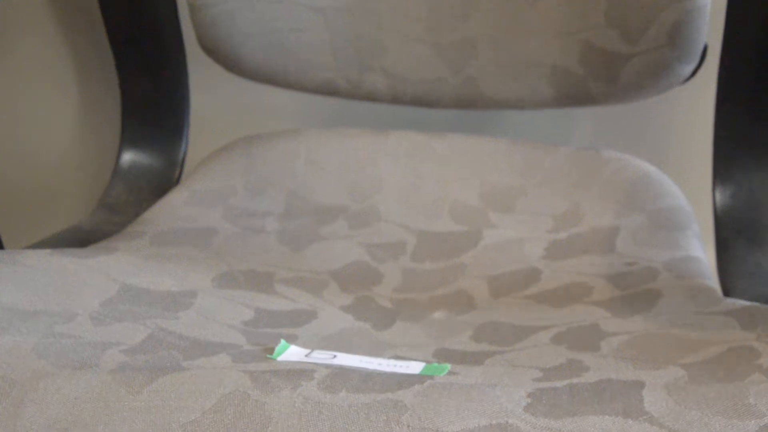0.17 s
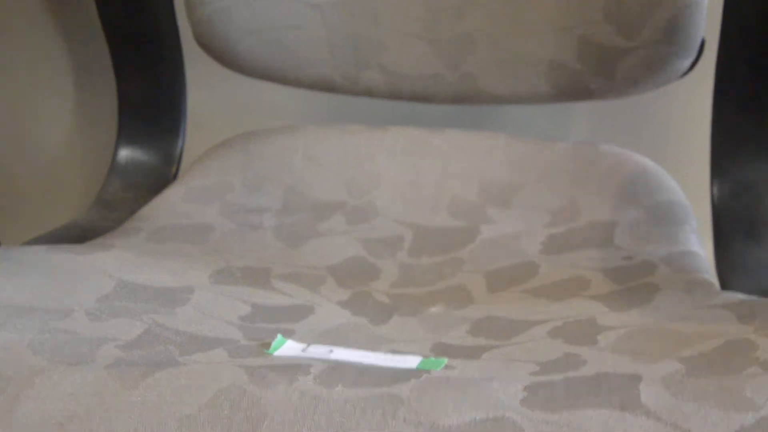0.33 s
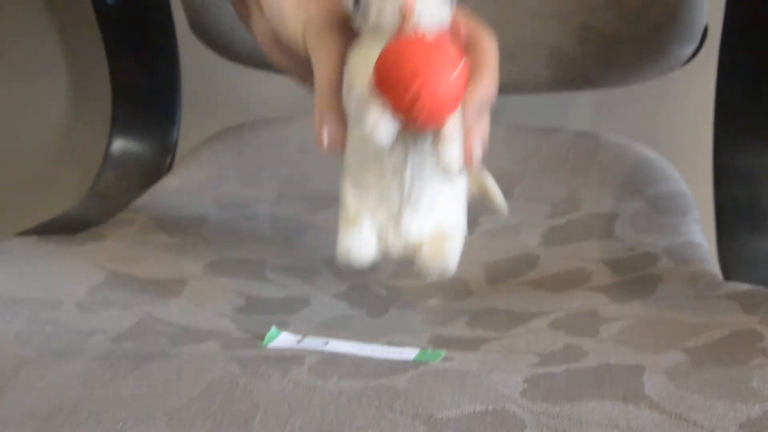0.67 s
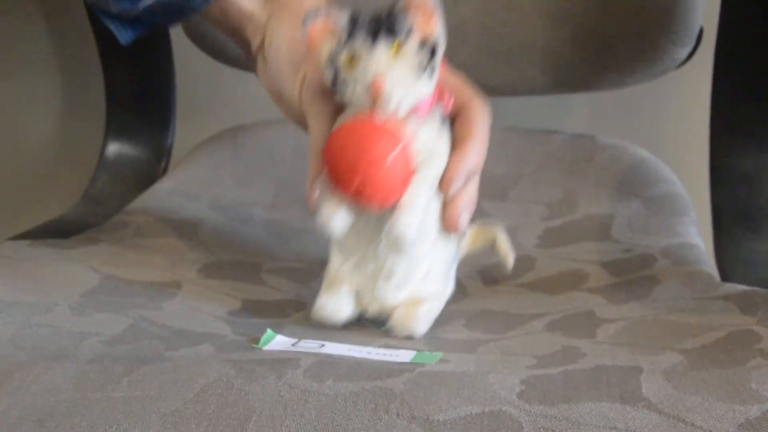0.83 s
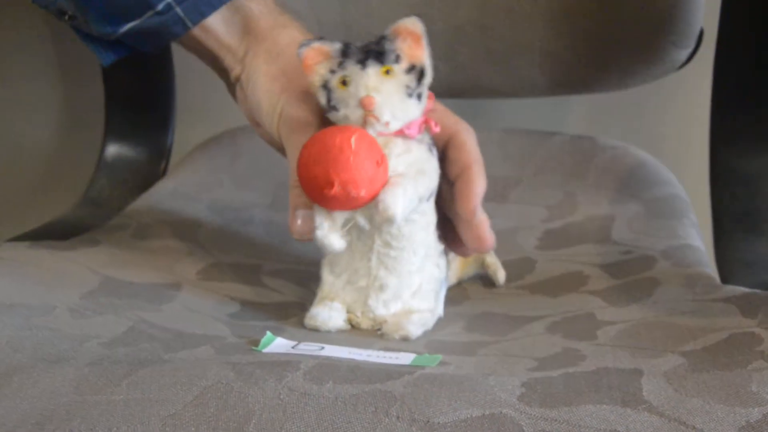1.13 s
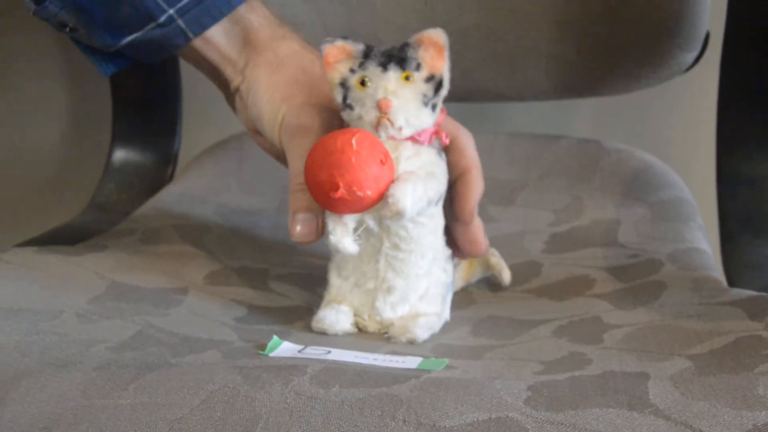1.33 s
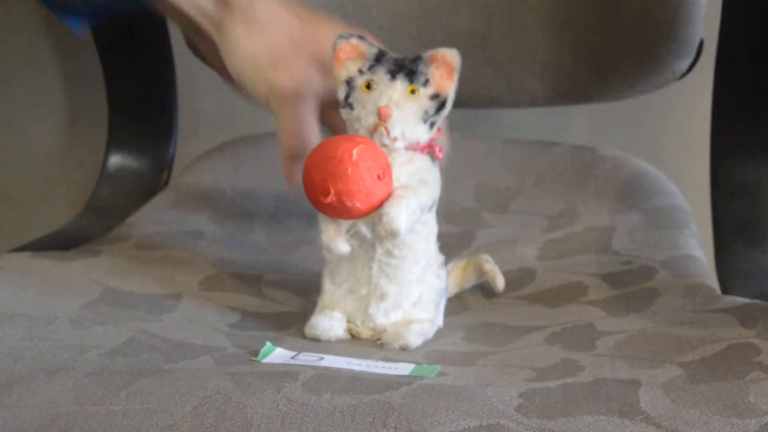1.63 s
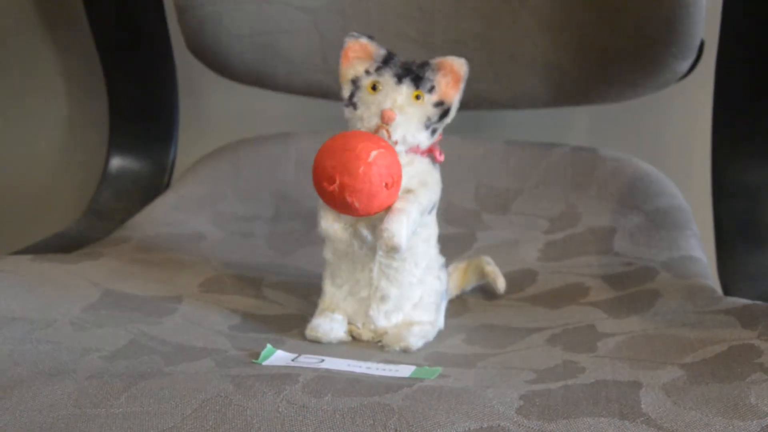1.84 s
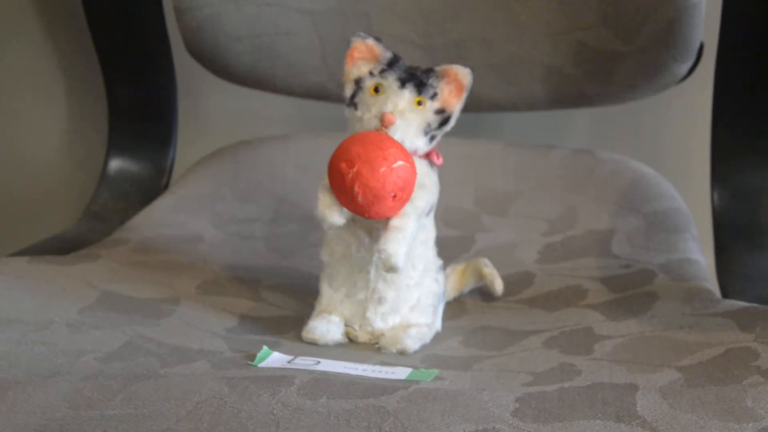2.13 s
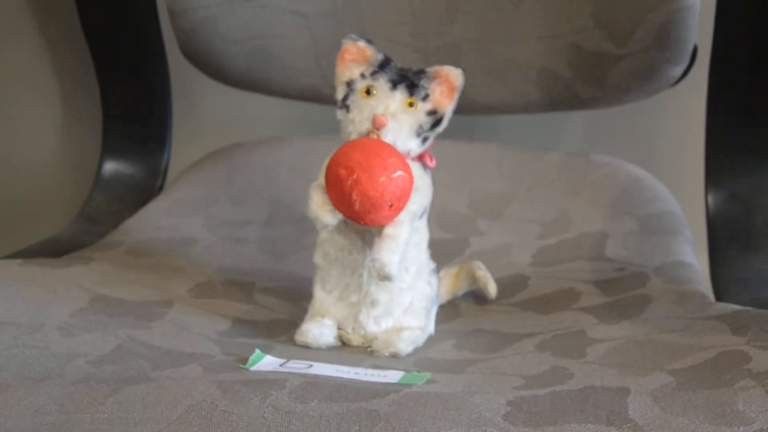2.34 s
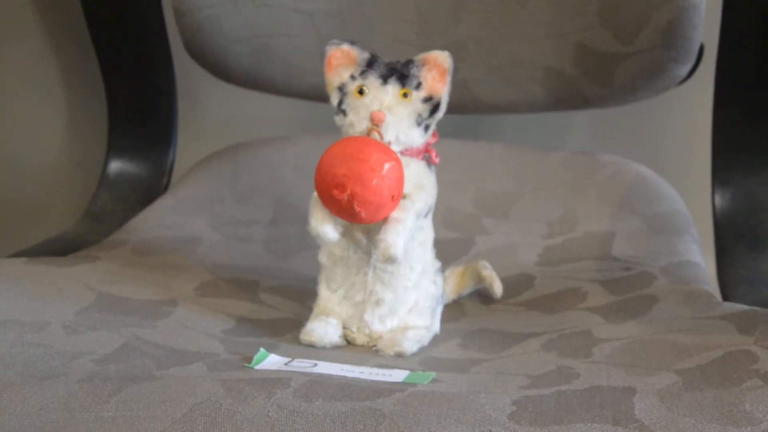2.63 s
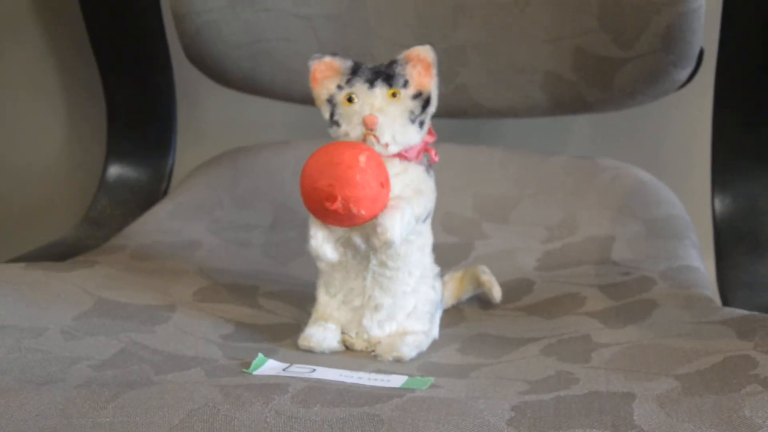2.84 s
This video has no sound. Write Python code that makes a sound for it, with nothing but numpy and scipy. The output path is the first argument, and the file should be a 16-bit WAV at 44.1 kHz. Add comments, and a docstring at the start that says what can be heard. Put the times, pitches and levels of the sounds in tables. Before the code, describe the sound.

Clockwork toy motor buzzing with a bright metallic clatter, one dull bump midway, in a small room

```python
"""A wind-up toy cat whirrs in the hand, is lowered, and is stood on a padded chair and left to run.
From the start its governor rattles twice a turn against a tin frame, over ticking gears.
Noise blows at the contact times drive the frame; the hollow body's low boom comes and goes.
As the hand lets go, the feet settle with a bump, made of a push, a thud and a short ring; later the toy
rocks once. A small room of dying noise, faint air noise and a thin electrical whine lie behind throughout."""
import sys
import numpy as np
from scipy import signal
from scipy.fft import rfft, irfft, next_fast_len
from scipy.io import wavfile
from scipy.ndimage import uniform_filter1d

SR = 44100
rng = np.random.default_rng(int(sys.argv[2]) if len(sys.argv) > 2 else 0)


def to_wav(s):
    """Save 16-bit WAV."""
    ch = np.atleast_2d(s).T  # columns
    pcm = np.round(np.clip(ch, -1, 1) * 32767)  # PCM
    wavfile.write(sys.argv[1], SR, pcm.astype(np.int16))


N = 131859

TIN_T60_S = 0.0066  # a short clatter falls by 60 dB in this time

# the feet meet the seat: t/s, level/dB
LANDINGS = [(1.9195, -1), (1.926, -12.5), (1.933, -9), (1.942, -8.5), (2.655, -14.5), (2.672, -15)]


def amp(db):
    """Turn decibels into gain."""
    return 10 ** (np.asarray(db) / 20)


def unit(x):
    """Scale to an rms (average strength) of 1."""
    return x / np.sqrt(np.mean(x ** 2) + 1e-20)


def along(points, hz):
    """Read a curve of (f/Hz, value) points on a log frequency axis."""
    f, v = np.transpose(points)
    return np.interp(np.log(hz + 1), np.log(f + 1), v)


def curves(rows):
    """Draw each column after the time as a curve with one value per sample."""
    s, *cols = np.transpose(rows)
    return [np.interp(np.arange(N) / SR, s, c) for c in cols]


def filtered(x, response):
    """Shape the spectrum of x by a response that depends on frequency."""
    m = 2 * next_fast_len(N)
    return irfft(rfft(x, m) * response(np.fft.rfftfreq(m, 1 / SR)), m)[:N]


def causal(gain):
    """Give a gain curve the timing of a real object: it answers only after it is struck (energy 1)."""
    c = irfft(np.log(np.maximum(unit(gain), 1e-6)))
    # fold the part before time zero onto the part after it
    c[1:len(c) // 2] *= 2
    c[len(c) // 2 + 1:] = 0
    return np.exp(rfft(c))


def coloured(x, spectrum):
    """Colour x by a causal response given as (f/Hz, level/dB) points."""
    return filtered(x, lambda hz: causal(amp(along(spectrum, hz))))


def resonances(hz, modes):
    """Add up resonances given as (f/Hz, width/Hz, level/dB), scaled to energy 1."""
    h = sum(amp(db) * 1j * hz * w / (c * c - hz * hz + 1j * hz * w) for c, w, db in modes)
    return h / np.sqrt(np.mean(np.abs(h) ** 2))


def blows(times, sizes, t60, ring=0):
    """Every blow lands a little differently: its own short clatter and an optional longer ring."""
    ring_t60_s = 0.07
    rise_s = .0005  # a contact chatters briefly before it is at full strength
    t = np.arange(SR // 8) / SR

    def dying(life):
        return np.exp(-np.log(1000) * t / life) / np.sqrt(life * SR / np.log(1e6))

    strike = dying(t60) * (1 - np.exp(-t / rise_s))
    shape = np.hypot(strike / np.linalg.norm(strike), ring * dying(ring_t60_s))
    at = np.clip(np.round(np.asarray(times) * SR).astype(int), 0, N - 1)
    # the energies of overlapping blows add up and set the strength of fresh noise
    energy = signal.oaconvolve(np.bincount(at, sizes ** 2, N), shape ** 2)[:N]
    return np.sqrt(np.abs(energy)) * rng.standard_normal(N)


def motor():
    """The same contacts rattle the frame and drive the hollow body, harder as the speed rises."""
    # spring motor: t/s, governor speed/(turns per second)
    speed_points = [(0.07, 66.58), (0.13, 69.69), (0.355, 62.23), (0.489, 47.02), (0.797, 49.49),
                    (0.911, 54.75), (1.023, 56.06), (1.127, 65.44), (1.577, 58.96), (1.703, 51.42),
                    (1.908, 39.13), (2.039, 47.1), (2.188, 56.56), (2.286, 67.29), (2.482, 72.21),
                    (2.665, 59.02), (2.785, 60.29), (2.99, 64.41)]
    # how the toy faces the listener as it is carried and set down:
    # t/s, level/dB, treble/dB, hollow body/dB, casing hum/dB
    pose = [(.07, 1.5, -2.5, -2, -15), (.18, -0.5, -4, -8, 7), (.24, 1.5, -6, -7, 1.5),
            (.315, 2.5, -4, -11, -3), (.4, -1, 4.5, -10, 0), (.5, 0.5, -1.5, -2, -1.5),
            (.62, -2, 4, 0.5, 5), (.75, -4, 5.5, 0, 1), (.9, -1, 2.5, -10, -7), (.99, -3, 2.5, 3.5, 7),
            (1.04, -1, -2.5, 0, 7), (1.25, -2, 1, 3, -5), (1.52, -0.5, -0.5, 1.5, -2),
            (1.62, -1.5, 2, 3.5, -3.5), (1.78, 1, -2, 2, 3.5), (1.88, 0, -1, 2, 0), (2.03, 2, -5, 0.5, -1),
            (2.15, -1.5, 2, 1, -1), (2.24, -0.5, -2.5, 1, -0.5), (2.52, -3, 1.5, 3.5, -7.5),
            (2.7, 1, -5, 2.5, 3), (2.8, -1, 1, 3, -1), (2.98, -0.5, -3, 2.5, 1)]
    # how much of the treble change each pitch gets: f/Hz, share
    treble_share = [(4500, 0.07), (7000, 0.51), (11000, 0.78), (14000, 0.84)]
    # colour of the low body clatter: f/Hz, level/dB
    body_colour = [(60, -37), (150, -37.5), (290, 0), (380, -0.5), (460, -4.5), (620, 2.5), (900, 0.5),
                   (1250, -8.5), (2200, -28.5)]
    # hollow body resonances: f/Hz, width/Hz, level/dB (all before squaring)
    hollow_modes = [(781, 170, 1.3), (869, 140, 2), (986, 69, -2.3)]
    # the frame's long-ringing modes: f/Hz, width/Hz, level/dB
    ringing_modes = [(2418, 45, -10.5), (3016, 56, -9.5), (3514, 27, -1.5), (4390, 48, -1.5),
                     (5220, 36, -4), (6600, 35, -12.5)]
    base_db, cruise_hz, db_per_doubling = -36.5, 55.5, 9.5  # base level is at cruising speed
    ring_db, hollow_db, ringing_db = -2.5, -17, -12.5  # dB; ring is relative to the strike
    body_db, body_t60_s = -54.5, 0.034
    body_follows = 0.24  # share of the motor's level changes that reaches the low clatter
    hum_mode, hum_db = (219, 36, 0), -60  # casing's lowest resonance: f/Hz, width/Hz before squaring, dB

    speed, = curves(speed_points)
    pose_db, treble_db, pose_hollow_db, pose_hum_db = curves(pose)
    times, sizes = contacts(speed)
    level = amp(base_db + db_per_doubling * np.log2(speed / cruise_hz) + pose_db)

    # split the rattle into short time slices so that its colour can change
    rattle = unit(tin(blows(times, sizes, TIN_T60_S, amp(ring_db))))
    hz, s, z = signal.stft(rattle, SR, nperseg=256)
    treble_now = np.interp(s, np.arange(N) / SR, treble_db)
    facing = amp(along(treble_share, hz)[:, None] * treble_now)
    frame = signal.istft(z * facing * shifting(hz, s), SR, nperseg=256)[1][:N]

    shake = blows(times, sizes, body_t60_s)
    body = amp(body_db) * (level / amp(base_db)) ** body_follows * unit(coloured(shake, body_colour))
    # squaring a response passes the sound through it twice, for a narrower peak
    boom = filtered(blows(times, sizes, TIN_T60_S), lambda hz: resonances(hz, hollow_modes) ** 2)
    hollow = amp(hollow_db + pose_hollow_db) * unit(boom)
    casing = filtered(shake, lambda hz: resonances(hz, [hum_mode]) ** 2)
    hum = amp(hum_db + pose_hum_db) * unit(casing)
    clatter = blows(times, sizes, TIN_T60_S)
    ringing = amp(ringing_db) * unit(filtered(clatter, lambda hz: resonances(hz, ringing_modes)))
    return level * (frame + hollow + ringing) + body + hum + swells(clatter)


def contacts(speed, count=200):
    """The turning governor strikes in two groups per turn while gear teeth tick; gives times and sizes."""
    # contacts in each turn of the governor: share of the turn, level/dB, timing scatter/turns
    governor = [(-.085, -3, 0.025), (-.025, -5.5, 0.022), (.045, -2.5, 0.023), (.37, -13.5, 0.021),
                (.53, -10, 0.033)]
    strike_scatter_db, strike_limit = 3, 1.1  # spread in dB, and its limit in standard deviations
    teeth_per_turn, gear_jitter = 14, 0.37  # jitter in teeth
    gear_db, gear_scatter_db = -8.5, 3

    turns = np.cumsum(speed) / SR
    where, levels = [], []
    for share, db, scatter in governor:
        where.append(np.arange(count) + share + scatter * rng.standard_normal(count))
        luck = rng.standard_normal(count).clip(-strike_limit, strike_limit)
        levels.append(db + strike_scatter_db * luck)
    teeth = rng.standard_normal((count * 20, 2))
    where.append((np.arange(len(teeth)) + gear_jitter * teeth[:, 0]) / teeth_per_turn)
    levels.append(gear_db + gear_scatter_db * teeth[:, 1])
    where, levels = np.concatenate(where), np.concatenate(levels)
    heard = (where > 0) & (where < turns[-1])
    # turn positions on the shaft into times
    return np.interp(where[heard], turns, np.arange(N) / SR), amp(levels[heard])


def tin(x):
    """The tin frame clatters bright and broad in the hand; once lowered, its main resonances stand out."""
    # brighter colour while held up close: f/Hz, level/dB
    held_colour = [(600, -20), (1050, -19), (1350, -18), (2000, -9), (2600, -8), (3500, -1.5), (4700, 0),
                   (5300, 0), (6400, -2.5), (7800, -3.5), (8600, -7), (9200, -8), (9900, -14.5),
                   (11300, -19), (12200, -20), (13500, -39)]
    # broad colour once lowered: f/Hz, level/dB
    lowered_colour = [(600, -22.5), (1200, -16), (1600, -12), (2300, -10.5), (2700, -6.5), (3250, -6),
                      (4050, -1), (4800, -4.5), (5600, -8.5), (6500, -4.5), (7300, -9), (8200, -7.5),
                      (9550, -17.5), (10400, -18), (11800, -30.5)]
    # resonances once lowered: f/Hz, width/Hz, level/dB
    modes = [(1986, 660, -9.5), (3010, 160, -7), (3565, 484, 4.5), (4420, 420, 2.5), (5180, 660, 1),
             (6130, 270, -5.5), (7230, 1060, -10), (9080, 660, -11.5), (10000, 270, -21)]
    # the clatter fades out at the very top: f/Hz, level/dB
    top = [(11800, 0), (13000, -11), (15000, -19)]
    # the toy moves away from the listener: start/s, end/s
    lowering = (0.28, 0.57)

    def lowered_response(hz):
        peaks = sum(amp(db) ** 2 / (1 + (2 * (hz - c) / w) ** 2) ** 2 for c, w, db in modes)
        broad = amp(along(lowered_colour, hz)) ** 2
        return causal(amp(along(top, hz)) * np.sqrt(broad + peaks))

    held = filtered(x, lambda hz: causal(amp(along(held_colour, hz) + along(top, hz))))
    lowered = filtered(x, lowered_response)
    share = np.interp(np.arange(N) / SR, lowering, (0, 1))
    return (1 - share) * held + share * lowered


def shifting(hz, s):
    """Small random changes of the rattle's colour, smooth over pitch and time."""
    depth_db, breadth_hz, length_s = 1.8, 520, .03
    field = rng.standard_normal((len(hz), len(s)))
    field = uniform_filter1d(field, round(breadth_hz / hz[1]), 0)
    return amp(depth_db * unit(uniform_filter1d(field, round(length_s / s[1]), 1)))


def swells(drive):
    """Narrow bands of the clatter swell and fade, some gliding slightly in pitch."""
    # start/s, end/s, first f/Hz, last f/Hz, width/Hz, level/dB
    bands = [(0.025, .2, 7350, 7300, 500, -40.5), (.03, 0.206, 6550, 6600, 400, -44.5),
             (.03, 0.238, 10500, 10900, 1400, -48.5), (0.028, 0.258, 436, 525, 350, -54),
             (0.187, 0.446, 8300, 8000, 554, -42), (0.198, 0.415, 9000, 9100, 700, -47),
             (.26, 0.396, 940, 1130, 130, -50.5), (0.245, 0.355, 4460, 4740, 1100, -39.5),
             (.66, 1.05, 2150, 2450, 600, -55), (0.866, 0.967, 7000, 7100, 200, -50),
             (1, 1.66, 2460, 2550, 220, -52), (2.19, 2.46, 4330, 4400, 262, -38),
             (2.186, 2.52, 3600, 3760, 400, -41.5), (2.114, 3.097, 2905, 2850, 230, -51),
             (2.15, 3.1, 2140, 2050, 350, -54.5)]
    t, out = np.arange(N) / SR, np.zeros(N)
    for start, end, first_hz, last_hz, width, db in bands:
        u = np.interp(t, (start, end), (0, 1))
        # move the band's centre down to zero, keep what is near it, and move it back up
        turn = np.exp(2j * np.pi * np.cumsum(first_hz + (last_hz - first_hz) * u) / SR)
        band = signal.lfilter(*signal.butter(2, width / SR), drive / turn)
        out += amp(db) * np.sqrt(np.abs(np.sin(np.pi * u))) * unit((band * turn).real)
    return out


def snaps():
    """Single sharp clicks of the tin frame, some of them in the landing rattle."""
    # t/s, level/dB
    clicks = [(.174, -10), (.2205, -13), (.312, -10), (.5305, -17), (.656, -18), (.758, -19), (1.0225, -16),
              (1.040, -14), (1.044, -15), (1.1055, -12.5), (1.152, -14.5), (1.215, -13), (1.26, -14),
              (1.3075, -12.5), (1.355, -13.5), (1.371, -12.5), (1.457, -14), (1.622, -14.5), (1.921, -15),
              (1.943, -15), (1.9935, -18), (2.0362, -10), (2.044, -17), (2.096, -17), (2.19, -15),
              (2.207, -14), (2.24, -11), (2.2575, -13), (2.286, -12), (2.315, -13), (2.4585, -13),
              (2.705, -13), (2.9483, -13)]
    t60_s, ring_db = .006, -7
    s, db = np.transpose(clicks)
    return tin(blows(s, amp(db), t60_s, amp(ring_db)))


def bumps():
    """Each landing is a dull push, a thud and a short ring of the hollow toy."""
    # colour of push and thud: f/Hz, level/dB
    thud_colour = [(40, -31), (130, -18), (260, -4), (380, 0.5), (560, 2), (860, 1), (1150, -10),
                   (1600, -12), (2600, -27), (6000, -40)]
    # ring of the toy on its feet: f/Hz, level/dB, t60/s
    foot_modes = [(300, -63, 0.1), (378, -43, 0.15), (506, -41, 0.22), (666, -48, 0.22), (830, -35, 0.12),
                  (1100, -44, 0.063), (1490, -39, 0.07)]
    thud_db, thud_t60_s, push_db = -11, .08, -5

    s, db = np.transpose(LANDINGS)
    push = np.bincount(np.round(s * SR).astype(int), amp(db), N)
    t = np.arange(SR // 4) / SR
    ring = np.zeros(len(t))
    for k, (hz, level, t60) in enumerate(foot_modes):
        # neighbouring modes start in opposite directions
        ring += (-1) ** k * amp(level) * np.exp(-np.log(1000) * t / t60) * np.sin(2 * np.pi * hz * t)
    noise = amp(thud_db) * blows(s, amp(db), thud_t60_s)
    thud = coloured(noise - amp(push_db) * push, thud_colour)
    return thud + signal.oaconvolve(push, ring)[:N]


def jolts():
    """Each landing shakes the loose works into a short bright rattle."""
    # f/Hz, level/dB
    rattle_colour = [(1000, -14), (1600, -7), (2500, -5.5), (3600, 0), (4700, 4.5), (6400, 1.5), (8200, -7),
                     (10500, -15), (12500, -29), (14000, -44)]
    base_db, t60_s = -6.5, 0.081
    follows = 0.53  # share of the landing's level, in dB, that reaches the rattle
    s, db = np.transpose(LANDINGS)
    return coloured(blows(s, amp(base_db + follows * db), t60_s), rattle_colour)


def burst(t60):
    """Noise of energy 1 that dies away, like many small echoes."""
    t = np.arange(SR // 3) / SR
    b = rng.standard_normal(len(t)) * np.exp(-np.log(1000) * t / t60)
    return b / np.linalg.norm(b)


def room(x, count=14):
    """A short room tail of noise, crossfaded steadily between fresh random bursts."""
    t60_s = .26
    place = np.linspace(0, count - 1, N)
    out = np.zeros(N)
    for k in range(count):
        nearness = np.sqrt(np.maximum(1 - np.abs(place - k), 0))
        out += signal.oaconvolve(x * nearness, burst(t60_s))[:N]
    return out


def air_noise():
    """Faint, steady noise of the air, strongest in the bass."""
    # f/Hz, level/dB
    air_colour = [(25, -2), (60, -2), (130, -2), (300, -5), (1000, -12), (5000, -18), (15000, -21)]
    return amp(-63.5) * unit(coloured(rng.standard_normal(N), air_colour))


def electrical_whine():
    """A thin, steady electrical whine: one very high sine tone."""
    whine_hz, rms_db = 15691, -67.5
    return amp(rms_db) * np.sqrt(2) * np.sin(2 * np.pi * whine_hz * np.arange(N) / SR)


def scene():
    """The toy, its room, faint air noise and a thin whine add up."""
    room_db = -13
    toy = motor() + snaps() + bumps() + jolts()
    return (toy + amp(room_db) * room(toy) + air_noise() + electrical_whine())[None]


def record(dry):
    """The sound has three narrow fixed notches, switches on abruptly and loses its very top."""
    # f/Hz, half width/Hz, depth/dB
    notch_table = [(5720, 230, 14), (6900, 110, 12), (15000, 220, 16)]
    start_s, top_hz = .072, 15780

    def notches(hz):
        return amp(-sum(db / (1 + ((hz - c) / w) ** 2) ** 2 for c, w, db in notch_table))

    notched = filtered(dry[0], notches)
    switched_on = notched * (np.arange(N) / SR > start_s)
    return filtered(switched_on, lambda hz: hz < top_hz)[None]


dry = scene()
out = record(dry)
to_wav(out)
```